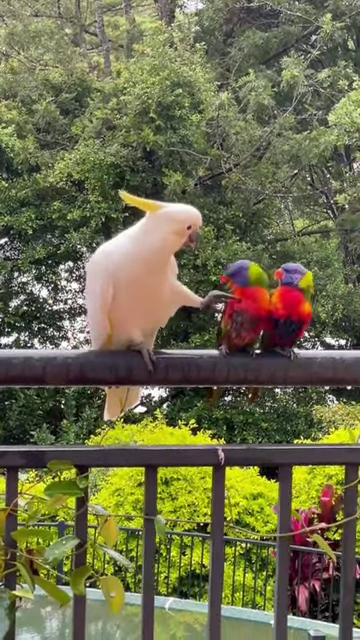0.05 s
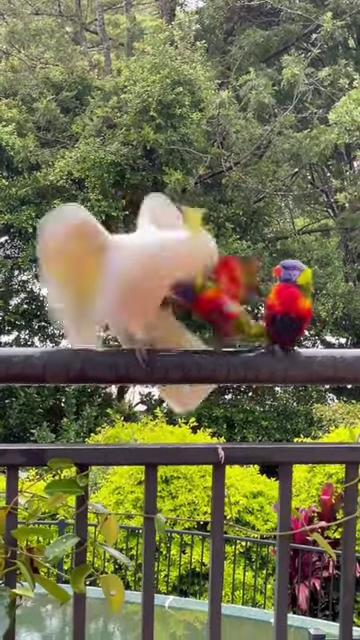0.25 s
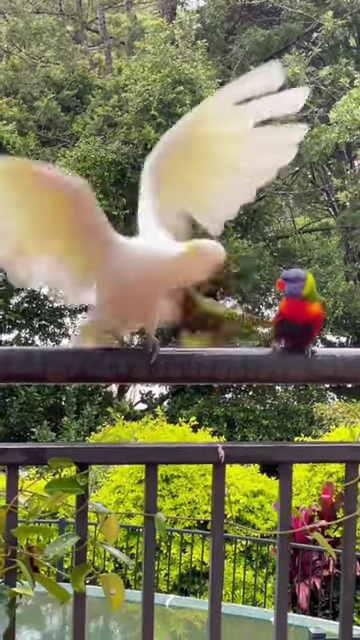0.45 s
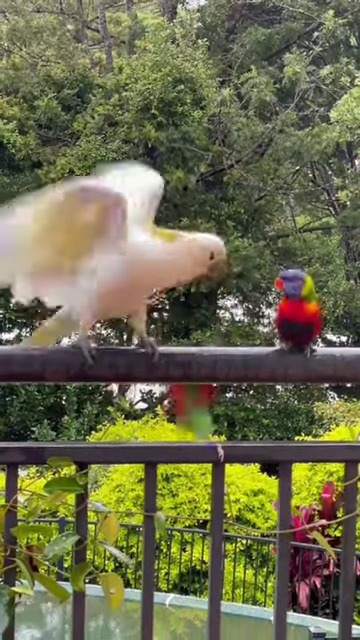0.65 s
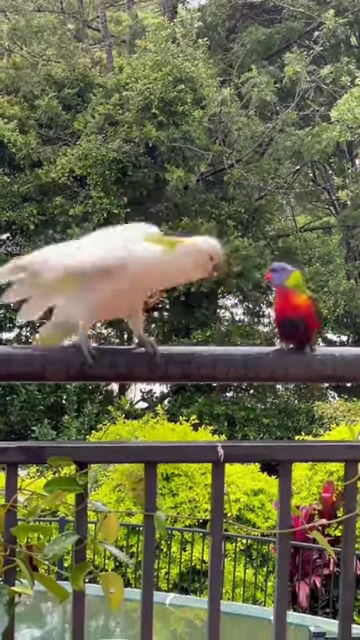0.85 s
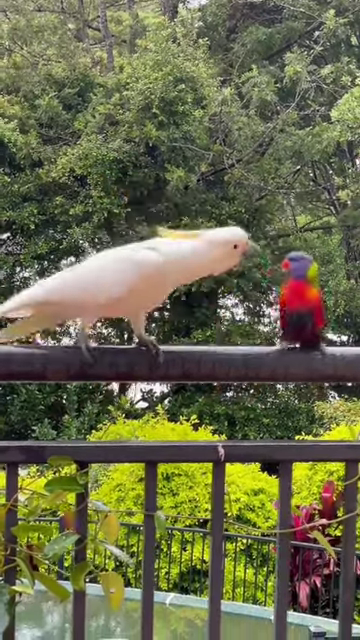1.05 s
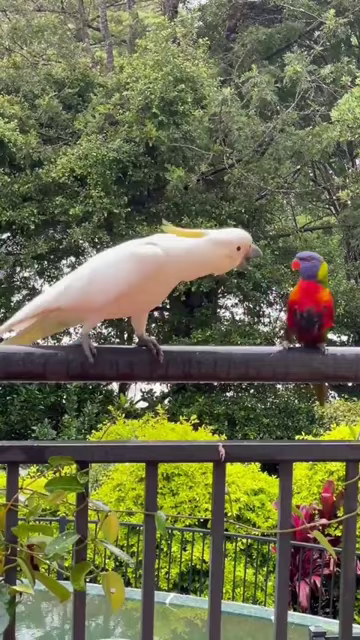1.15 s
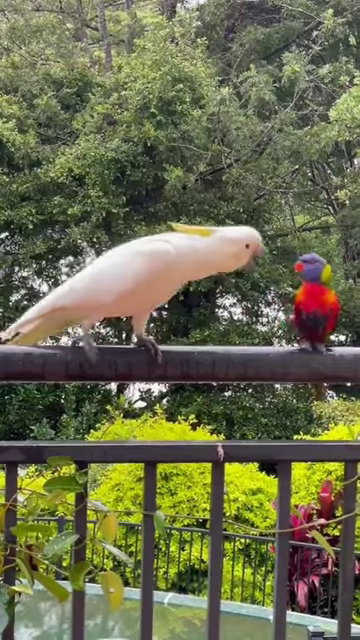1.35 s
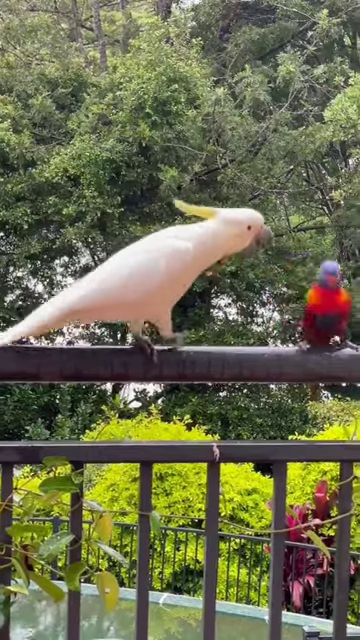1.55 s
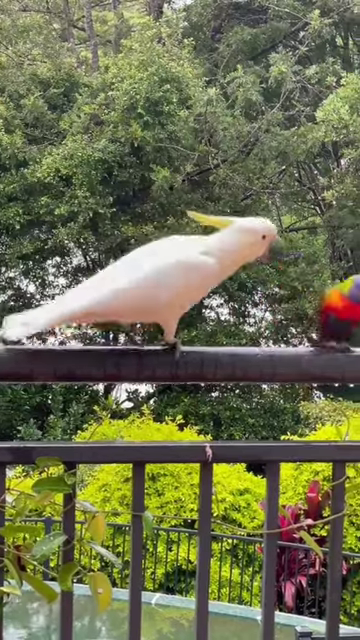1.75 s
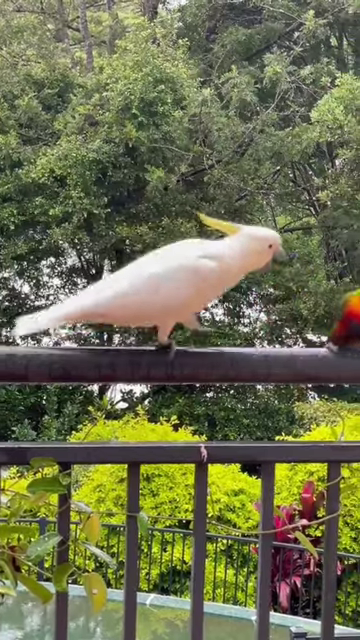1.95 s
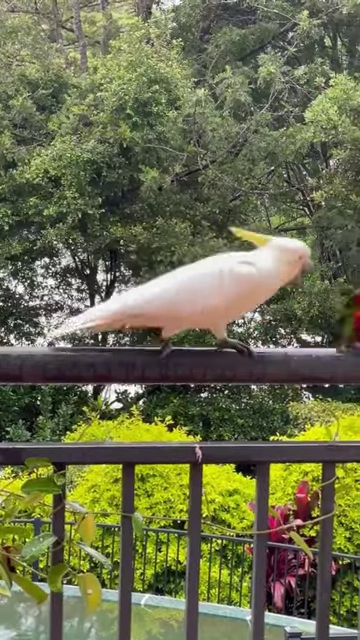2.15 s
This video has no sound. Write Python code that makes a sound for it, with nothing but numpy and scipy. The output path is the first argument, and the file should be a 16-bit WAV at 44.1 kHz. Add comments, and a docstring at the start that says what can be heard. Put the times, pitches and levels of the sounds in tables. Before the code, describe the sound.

A parrot's harsh screech bursts out close by from 0.2 to 0.4 seconds, shrill, cracking into rasp and buzz, with short wall reflections and a faint tail from trees. Wing puffs and hollow thuds flutter quickly from 0.5 to 0.9, fading by 1.1. Quiet claw taps tick on a metal rail, clearest near 2.0. Low rumble and hum continue underneath, with faint far bird whistles after 1.2 and slight bright hiss.

```python
"""Parrot screech on a balcony

Close by, a parrot gives one harsh screech: tone, rasp and buzz through a resonant throat, with hard cracks.
Near walls and the trees beyond answer it with diffuse tails and scattered echoes.
A small parrot whirrs off on shaped puffs of noise, low pushes and thuds; claws ring the metal rail's modes.
Behind them lie a hum, a low outdoor rumble, gliding far bird whistles and faint swells of bright hiss."""
import sys
import numpy as np
from scipy import signal
from scipy.fft import rfft, irfft, next_fast_len
from scipy.io import wavfile
from scipy.ndimage import uniform_filter1d, minimum_filter1d, map_coordinates

SR = 44100
rng = np.random.default_rng(int(sys.argv[2]) if len(sys.argv) > 2 else 0)


def digitize_waveform(pressure):
    """Quantize a signal to 16-bit integers and store it at the path in sys.argv[1].

    Rows of a 2-D input are taken as channels; values are limited to [-1, 1].
    """
    field = np.atleast_2d(pressure).T
    bounded = np.clip(field, -1, 1)
    quanta = np.round(bounded * 32767).astype(np.int16)
    wavfile.write(sys.argv[1], SR, quanta)


N = 97020  # 2.2 s


def amp(db):
    """Decibels to gain."""
    return 10 ** (np.asarray(db) / 20)


def unit(x):
    """x at rms 1."""
    return x / np.sqrt(np.mean(x ** 2) + 1e-20)


def along(points, hz):
    """(frequency, value) points read on a log frequency axis."""
    f, v = np.transpose(points)
    return np.interp(np.log(hz + 1), np.log(f + 1), v)


def clock():
    """Time of every sample in seconds."""
    return np.arange(N) / SR


def curves(rows):
    """One value per sample for each column after the time."""
    s, *cols = np.transpose(rows)
    return [np.interp(clock(), s, c) for c in cols]


def wobble(rate):
    """A smooth random curve, rate knots a second."""
    knots = rng.standard_normal(int(N * rate / SR) + 4)
    return map_coordinates(knots, [clock() * rate])


def sine(cycles):
    """A sine wave from its count of cycles."""
    return np.sin(2 * np.pi * cycles)


def filtered(x, response):
    """x times a response of frequency, padded so that its ringing does not wrap round."""
    m = next_fast_len(N + SR // 2)
    return irfft(rfft(x, m) * response(np.fft.rfftfreq(m, 1 / SR)), m)[..., :N]


def coloured(x, points):
    """x filtered to a curve of (frequency [Hz], gain [dB])."""
    return filtered(x, lambda hz: amp(along(points, hz)))


def causal(gain):
    """The minimum-phase response with this gain, which rings only after its cause."""
    cepstrum = irfft(np.log(np.maximum(gain, 1e-6)))
    half = len(cepstrum) // 2
    cepstrum[1:half] *= 2
    cepstrum[half + 1:] = 0
    return np.exp(rfft(cepstrum))


# likeness of left and right at the microphone: (frequency [Hz], correlation [0 to 1])
LIKENESS = [(100, 1), (200, 0.99), (500, 0.57), (1500, 0.66), (5000, 0.48), (12000, .1)]


def rush(spectrum):
    """Stereo noise of rms 1, alike in the bass and nearly unrelated in the treble."""
    def mid_side_gain(hz):
        turn = np.arccos(np.clip(along(LIKENESS, hz), -1, 1)) / 2
        return amp(along(spectrum, hz)) * [np.cos(turn), np.sin(turn)]

    mid, side = filtered(rng.standard_normal((2, N)), mid_side_gain)
    return unit(np.array([mid + side, mid - side]))


def reverb(x, t60s):
    """A diffuse stereo tail in which each frequency dies at its own speed."""
    hz, t, z = signal.stft(rng.standard_normal((2, SR)), SR, nperseg=256)
    decay = amp(-60 * t / along(t60s, hz)[:, None])
    tail = signal.istft(z * decay, SR, nperseg=256)[1]
    return signal.fftconvolve(x[None], tail / np.linalg.norm(tail[0]), axes=1)[:, :N]


def tones(rows, waver, rough_db):
    """Gliding tones that swell and fade, unsteady in pitch and level."""
    t, out = clock(), np.zeros(N)
    for start, end, from_hz, to_hz, db in rows:
        progress = np.clip((t - start) / (end - start), 0, 1)
        hz = (from_hz + (to_hz - from_hz) * progress) * (1 + waver * wobble(70))
        swell = np.sqrt(8 * progress * (1 - progress))
        out += amp(db + rough_db * wobble(280)) * swell * sine(np.cumsum(hz) / SR)
    return out


# far bird notes: (start [s], end [s], start pitch [Hz], end pitch [Hz], level [dB])
FAR_WHISTLES = [(1.2, 1.45, 1490, 1505, -75), (1.34, 1.65, 1535, 1570, -71), (1.36, 1.66, 765, 785, -74),
                (1.6, 1.8, 1296, 1110, -72), (1.54, 1.68, 2550, 2950, -81), (1.69, 1.88, 2800, 2950, -78),
                (1.76, 1.84, 2040, 1990, -75), (1.58, 1.7, 5400, 5850, -84)]
# colour of the outdoor rumble: (frequency [Hz], relative level [dB])
RUMBLE_COLOUR = [(20, -40), (35, -16.5), (55, -8.5), (120, -14), (210, -14), (290, -18.5), (470, -25),
                 (800, -25), (1450, -30), (2100, -38.5), (4000, -42), (7000, -48), (11000, -41.5),
                 (13000, -51.5)]
# outdoor rumble at the microphone: (time [s], level [dB])
RUMBLE_LEVEL = [(0, -57.5), (.45, -49), (.8, -50), (1.3, -55.5), (2.2, -56)]
HUM_HZ, HUM_DB, HUM_WAVER_DB = 171, -53, 1.6


def garden():
    """A slightly wavering hum, perhaps a pool pump, outdoor rumble and far bird whistles."""
    phase_waver = 0.14 * wobble(6)  # radians
    hum = np.sqrt(2) * np.sin(2 * np.pi * HUM_HZ * clock() + phase_waver)
    hum = hum * amp(HUM_DB + HUM_WAVER_DB * wobble(6.3))
    rumble_db, = curves(RUMBLE_LEVEL)
    rumble = amp(rumble_db + 0.52 * wobble(7.9)) * rush(RUMBLE_COLOUR)
    return hum + rumble + tones(FAR_WHISTLES, waver=0.0201, rough_db=4.5)


# faint swells of bright hiss: (time of the middle [s], level [dB], half length to 1/e [s])
HISS_SWELLS = [(1.04, -69.5, .09), (1.866, -66, 0.033), (2.083, -66, 0.14)]
# colour of the hiss, strongest near 10.5 kHz: (frequency [Hz], relative level [dB])
HISS_COLOUR = [(2500, 0), (4300, 8), (8800, 0.5), (10500, 14.5), (13000, -3)]


def bright_hiss():
    """Bright noise, strongest near 10.5 kHz, in faint unsteady swells."""
    t = clock()
    swell = sum(amp(db) * np.exp(-((t - s) / length) ** 2) for s, db, length in HISS_SWELLS)
    return swell * amp(4.7 * wobble(50.22)) * rush(HISS_COLOUR)


# claws on the rail: (time [s], level [dB], decay of the scratch to 1/e [s], relative ring [dB],
# brightness of the ring [dB per octave])
CLAW_TAPS = [(1.022, -58.5, 0.015, 6.5, 0.5), (1.046, -72, 0.014, 2, -4), (1.35, -68.5, 0.015, 10, 1.5),
             (1.46, -69, 0.015, 9.5, -6.5), (1.755, -61.5, 0.013, 7.5, 5.5), (1.862, -58, 0.0082, -0.5, 11),
             (1.9916, -43.5, 0.0046, 7.5, -3), (2, -54, 0.0057, 6.5, 3), (2.163, -68, .006, 5.5, -3.5)]
# modes of the metal rail: (frequency [Hz], relative level [dB], t60 [s])
RAIL_MODES = [(1104, -18.5, .2), (1450, -13.5, 0.063), (3640, -20, .025), (4220, -6.5, .09),
              (4400, -3, 0.026), (5249, -9, 0.021), (5800, -9.5, .035), (7880, -1, .07), (8030, 6, 0.029),
              (10390, -8, 0.089), (11740, -10.5, .04)]
# colour of the claw's tick: (frequency [Hz], relative level [dB])
CLAW_COLOUR = [(1000, -18), (3000, -14), (4300, 4), (6500, -0.5), (8300, -2.5), (11000, 4), (13000, 0.5)]
# the balcony's answer to the taps: (frequency [Hz], t60 [s])
TAP_WALLS = [(1000, 0.28), (10000, .25)]
CLAW_DB, TAP_ECHO_DB = 1, -5.5
RATTLE = 0.97  # unevenness of the rail's ring


def rail_ring(age, bright_db):
    """Decaying modes of the rail in a blend of their own, scaled to unit energy and then made uneven."""
    ring = np.zeros(len(age))
    for hz, db, t60 in RAIL_MODES:
        tilt_db = bright_db * np.log2(hz / RAIL_MODES[0][0])
        ring += amp(db + tilt_db + rng.normal(0, 1.47) - 60 * age / t60) * sine(hz * age)
    return ring * (1 + RATTLE * wobble(300)[:len(age)]) / np.linalg.norm(ring)


def claws():
    """Each brief scratch ticks and drives the rail's modes with noise; the walls answer."""
    t, age = clock(), clock()[:SR // 3]
    rail, touch = np.zeros((2, N)), np.zeros(N)
    for s, tap_db, length, ring_db, bright_db in CLAW_TAPS:
        contact = amp(tap_db) * (t > s) * np.exp(-np.abs(t - s) / length)
        ring = amp(ring_db) * rail_ring(age, bright_db)
        scratch = contact * rng.standard_normal((2, N))
        rail += signal.fftconvolve(scratch, ring[None], axes=1)[:, :N]
        touch += contact
    ticks = amp(CLAW_DB + 1.3 * wobble(400)) * touch * rush(CLAW_COLOUR)
    taps = rail + ticks
    return taps + amp(TAP_ECHO_DB) * reverb(taps.mean(axis=0), TAP_WALLS)


# air stirred between strokes: (time [s], level [dB])
STIRRED_LEVEL = [(.45, -66), (.56, -52.5), (.7, -50), (.82, -58.5), (1.0, -60.5), (1.35, -55.5), (1.5, -74)]
# colour of that air: (frequency [Hz], relative level [dB])
STIRRED_COLOUR = [(30, -12.5), (60, 2), (130, -2.5), (330, -6.5), (700, -16.5), (1500, -24.5),
                  (4000, -42.5)]


def stirred_air():
    """Air keeps churning between the wingbeats: low noise with a wavering level."""
    level_db, = curves(STIRRED_LEVEL)
    return amp(level_db + wobble(45)) * rush(STIRRED_COLOUR)


# wing strokes: (time [s], air puff [dB], low push [dB], feather swish [dB])
WING_STROKES = [(.26, -37, -44, -65.5), (.52, -47, -56, -47), (.578, -44, -40.5, -56), (.63, -47, -50, -56),
                (.654, -46.5, -39, -57.5), (0.692, -47, -51, -70), (0.723, -45, -44, -54),
                (0.759, -48.5, -55, -61), (.783, -45, -51, -55.5), (.822, -48.5, -54, -62.5),
                (0.855, -54.5, -62, -68), (0.921, -54.5, -44.5, -66), (.996, -54, -50, -71),
                (1.06, -58, -47, -86), (1.108, -62, -53, -72)]
# colour of the puffs: (frequency [Hz], relative level [dB])
PUFF_COLOUR = [(60, 3.5), (150, -14.5), (400, 3.5), (620, -2), (1000, -4.5), (1600, -13), (3000, -20.5),
               (8000, -39)]
# colour of the swishes: (frequency [Hz], relative level [dB])
SWISH_COLOUR = [(800, -12.5), (2500, 2.5), (5000, -4), (8500, -4.5), (11000, 4), (13000, -27)]
PUFF_S, PUSH_S, SWISH_S = 0.011, 0.02, 0.015  # half lengths: puff to half gain, others to 1/e
PUSH_HZ = 58.6


def wings():
    """Each stroke pushes a low wave of air, with a puff and a swish of feathers."""
    t = clock()
    puff, push, swish = np.zeros((3, N))
    for s, puff_db, push_db, swish_db in WING_STROKES:
        age = t - s
        puff += amp(puff_db) / (1 + (age / PUFF_S) ** 4)
        push += amp(push_db) * np.exp(-(age / PUSH_S) ** 2) * sine(PUSH_HZ * age)
        swish += amp(swish_db) * np.exp(-(age / SWISH_S) ** 2)
    return puff * rush(PUFF_COLOUR) + push + swish * rush(SWISH_COLOUR)


# hard wing claps: (time [s], frequency [Hz], level before the lean [dB])
WING_THUDS = [(.646, 517.5, -36), (.655, 623, -36), (.691, 561.5, -39), (0.785, 882, -45), (.819, 384, -58),
              (.853, 865, -46.5), (1.104, 479.6, -52.5)]
THUD_RISE_S, THUD_LEAN_DB = 0.0029, 8  # rise to the peak; left minus right


def thuds():
    """The strongest wing claps give a short hollow thud, a little to the left."""
    out = np.zeros(N)
    for s, hz, db in WING_THUDS:
        age = np.maximum(clock() - s, 0)
        swell = age / THUD_RISE_S * np.exp(1 - age / THUD_RISE_S)
        out += amp(db) * swell * sine(hz * age)
    return out * amp(THUD_LEAN_DB * np.array([[.5], [-.5]]))


CHAOS_HZ, CHAOS_SCATTER = 520.3, .3  # central rate of the pulses and its scatter in log units
NOISE_SHARE, SIZE_DB = 0.76, 1.5  # power share of noise bursts, scatter of pulse size


def rasp():
    """Chaotic pulses, each with a decaying burst of noise."""
    cycle = np.cumsum(CHAOS_HZ * np.exp(CHAOS_SCATTER * wobble(500))) / SR
    pulses = np.diff(np.floor(cycle), prepend=0) * amp(SIZE_DB * rng.standard_normal(N))
    bursts = rng.standard_normal(N) * np.exp(-2.5 * (cycle % 1))
    return np.sqrt(NOISE_SHARE) * unit(bursts) - np.sqrt(1 - NOISE_SHARE) * unit(pulses)


# the parrot's voice: (time [s], pitch [Hz], clear tone over the rasp [dB],
# quarter subharmonics over the rasp [dB])
PARROT_VOICE = [(0.209, 1125, 1, -16.5), (.222, 1112, -7, -10.5), (.236, 1004, -5.5, -8),
                (0.241, 982.7, -7.5, -11), (.254, 998, -1.5, -3.5), (0.267, 1036, -2, -8),
                (0.285, 972.4, -11, 1.5), (.3, 978.3, -11, 5), (.318, 979.8, -9.5, 5),
                (.333, 1024, -11, -4.5), (0.349, 1025, -9.5, -3.5), (0.365, 1064, 0, -6),
                (.38, 1043, -5, -8.5), (.41, 1094, -14.5, -12)]
FLUTTER_DB = 4  # unsteadiness of each partial


def partials(cycle, multiples, colour):
    """Fluttering lines on these multiples of the pitch, at rms 1."""
    median_hz = np.median([row[1] for row in PARROT_VOICE])
    lines = np.zeros(N)
    for k in multiples:
        level_db = along(colour, k * median_hz) + FLUTTER_DB * wobble(90)
        lines += amp(level_db) * sine(k * cycle + rng.random())
    return unit(lines)


# broad resonance of the throat: (frequency [Hz], gain [dB])
THROAT_COLOUR = [(150, -41), (330, -22), (520, -26.5), (680, -13), (1100, -7), (1550, -11.5), (2100, -10),
                 (3000, -8), (4000, -8), (5600, -16), (7000, -18), (8500, -24), (10500, -20),
                 (12300, -23.5), (13300, -38)]
# sharp resonances of throat and beak: (frequency [Hz], half width to 1/e [Hz], lift [dB])
BEAK_RESONANCES = [(740, 26, 0), (850, 60, -9), (1516, 55, -8), (1715, 76, 2), (2240, 180, 5),
                   (2340, 50.5, -3.5), (2460, 55, 3.5), (2930, 90, 1.5), (3582, 60, -6.5), (4520, 660, -4),
                   (5160, 59, 3.5), (5754, 320, 3.5)]


def throat(hz):
    """Throat and beak as one causal filter."""
    gain_db = along(THROAT_COLOUR, hz)
    for centre, width, lift_db in BEAK_RESONANCES:
        gain_db = gain_db + lift_db * np.exp(-((hz - centre) / width) ** 2)
    return causal(amp(gain_db))


# the voice cracks in single hard pulses: (time [s], peak before the balcony [dB])
VOICE_CRACKS = [(.2382, 7.5), (.254, 1), (.2722, 2.5)]


def cracks():
    """Single hard pulses ring the throat, whose response is scaled to a peak of 1."""
    pulses = np.zeros(N)
    for s, db in VOICE_CRACKS:
        pulses[round(s * SR)] = -amp(db)
    return filtered(pulses, lambda hz: throat(hz) / np.abs(irfft(throat(hz))).max())


# the screech: (time [s], level before the overall lift [dB],
# then relative low, middle, upper and top bands [dB])
SCREECH_LEVEL = [(.21, -44.5, -4, -7, -17, -23), (.215, -32, -5.5, -9, -13, -22.5),
                 (.224, -20.5, -7.5, -4.5, -6.5, -18), (.234, -17, -7, -1.5, -17, -24),
                 (.238, -5.5, -12.5, -1.5, -19, -15.5), (.255, -4.5, -13.5, -2.5, -23, -13.5),
                 (.272, -8.5, -13, 0, -8, -10), (.295, -12.5, -13.5, -4, -3.5, -19.5),
                 (.312, -8.5, -16, -6, -5, -15.5), (.333, -6.5, -12, -6.5, -10, -9),
                 (.348, -9.5, -14, -1.5, -9, -25), (.362, -16, -7.5, -5.5, -7, -11.5),
                 (.385, -27, -8.5, 0.5, -12, -36), (.412, -38.5, -14, -0.5, -4, -4)]
# centres of those bands: [Hz]
SCREECH_BANDS = [1100, 2600, 5600, 9500]
# colour of the clear tone: (frequency [Hz], relative level [dB])
TONE_COLOUR = [(1000, 0), (2050, 1.5), (3000, -0.5), (4100, -4), (6000, 1.5), (12000, -6.5)]
# colour of the buzz: (frequency [Hz], relative level [dB])
BUZZ_COLOUR = [(500, -7.5), (735, 5), (1250, -5), (2200, 0.5), (4400, -2), (5400, 5.5), (12000, -4)]
SCREECH_DB = 1.5  # overall lift
JITTER = .013  # unsteadiness of the pitch, as a share


def screech():
    """A shrill tone breaks into rasp, then a buzz two octaves down, and returns, in four shaped bands."""
    t = clock()
    pitch_hz, tone_db, buzz_db = curves(PARROT_VOICE)
    cycle = np.cumsum(pitch_hz * (1 + JITTER * wobble(300))) / SR
    tone = amp(tone_db) * partials(cycle, np.arange(1, 12), TONE_COLOUR)
    buzz = amp(buzz_db) * partials(cycle, np.arange(2, 46) / 4, BUZZ_COLOUR)
    voice = filtered(rasp() + tone + buzz, throat)
    level_db, *bands_db = curves(SCREECH_LEVEL)
    call = np.zeros(N)
    for pick, band_db in zip(np.eye(len(SCREECH_BANDS)), bands_db):
        weights = list(zip(SCREECH_BANDS, pick))  # 1 at this band's centre, 0 at the others
        band = filtered(voice, lambda hz: along(weights, hz))
        # even out the level over about 20 ms before the table shapes it
        steady = band / np.sqrt(np.abs(uniform_filter1d(band ** 2, size=900)) + 1e-12)
        call += steady * amp(level_db + band_db)
    sounding = (t > SCREECH_LEVEL[0][0]) & (t < SCREECH_LEVEL[-1][0])
    soft_gate = uniform_filter1d(sounding.astype(float), size=200)
    return amp(SCREECH_DB) * call * soft_gate + cracks()


PATCHY_DB = 1.5


def patchy(x):
    """x with random patches of gain in time and frequency."""
    z = signal.stft(x, nperseg=512)[2]
    field = uniform_filter1d(rng.standard_normal(z.shape[1:]), size=3, axis=0)
    field = uniform_filter1d(field, size=5, axis=1)
    return signal.istft(z * amp(PATCHY_DB * unit(field)), nperseg=512)[1][:, :N]


# decay between the near walls: (frequency [Hz], t60 [s])
WALL_DECAY = [(300, .12), (2500, 0.12), (11000, 0.16)]
ECHO_S, ECHO_SPREAD_S = .15, .08  # middle and half width of the spread of delays


def scattered(x, count):
    """Separate reflections from trunks and fences, each blurred by foliage."""
    places = 2 * (np.arange(count) + rng.random(count)) / count - 1
    delays = ECHO_S + ECHO_SPREAD_S * places
    echoes = sum(np.roll(reverb(x, WALL_DECAY), round(s * SR), axis=1) for s in delays)
    return echoes / np.sqrt(count)


# near walls against the direct call: (frequency [Hz], level [dB])
WALL_COLOUR = [(500, -12), (2500, -6.5), (6000, 1), (11000, 4)]
# lean of the near call: (frequency [Hz], left minus right [dB])
CALL_LEAN = [(200, -1.5), (360, 1), (650, 8.5), (1150, 7.5), (1600, -0.5), (12000, -0.5)]
# decay among the trees: (frequency [Hz], t60 [s])
TREE_DECAY = [(400, 0.69), (2500, 0.93), (6000, 1.05), (11000, 1.2)]
# colour of the long tail from the trees: (frequency [Hz], gain [dB])
TREE_COLOUR = [(900, -1.5), (2500, 2), (6000, -2), (8700, 1.5), (10500, 1.5), (12500, -1.5)]
# colour of the scattered echoes: (frequency [Hz], gain [dB])
SCATTER_COLOUR = [(900, 3.5), (1600, -1), (2600, 4), (3600, 0), (6500, 2), (8700, 1.5), (10300, 2.5),
                  (12500, -6.5)]
TREES_DB, ECHO_DB = -27.5, -30.5


def balcony(call):
    """Near walls thicken the call; the trees return scattered echoes and a long uneven tail."""
    def lean_gain(hz):
        sides = amp(np.outer([.5, -.5], along(CALL_LEAN, hz)))
        return sides / np.hypot(1, amp(along(WALL_COLOUR, hz)))  # offsets the power the walls add

    walls = coloured(reverb(call, WALL_DECAY), WALL_COLOUR)
    near = filtered(call + walls, lean_gain)
    echo = coloured(scattered(call, count=8), SCATTER_COLOUR)
    tail = coloured(reverb(call, TREE_DECAY), TREE_COLOUR)
    return near + patchy(amp(TREES_DB) * tail + amp(ECHO_DB) * echo)


def scene():
    """All sources at the microphone, from the far garden to the close screech."""
    behind = garden() + bright_hiss() + claws()
    flight = stirred_air() + wings() + thuds()
    return behind + flight + balcony(screech())


DUCK_ABOVE_DB, DUCK_SLOPE = -20.5, 0.5  # threshold, dB of cut per dB over it
HOLD_S, RECOVER_S = 0.16, 0.232  # hold of the cut, time to win back 10 dB
MIC_LOW_HZ, TOP_HZ = 32.3, 13000  # half-gain corners of the band


def record(dry):
    """Gain control ducks under loud sound, holds and recovers; peaks round off; both band ends are cut."""
    power = uniform_filter1d(np.mean(dry ** 2, axis=0), size=400)
    loud_db = 10 * np.log10(np.abs(power) + 1e-12)
    cut_db = DUCK_SLOPE * np.maximum(loud_db - DUCK_ABOVE_DB, 0)
    hold = max(int(HOLD_S * SR / 2), 1)
    # the deepest cut called for in the last HOLD_S
    need_db = -minimum_filter1d(-cut_db, 2 * hold + 1, origin=hold)
    recovery_db = 10 * clock() / RECOVER_S
    held = dry * amp(recovery_db - np.maximum.accumulate(need_db + recovery_db))
    rounded = held / (1 + np.abs(held / .92) ** 6) ** (1 / 6)
    low_cut = filtered(rounded, lambda hz: hz ** 4 / (hz ** 4 + MIC_LOW_HZ ** 4))
    return filtered(low_cut, lambda hz: 1 / (1 + (hz / TOP_HZ) ** 120))


dry = scene()
out = record(dry)
digitize_waveform(out)
```